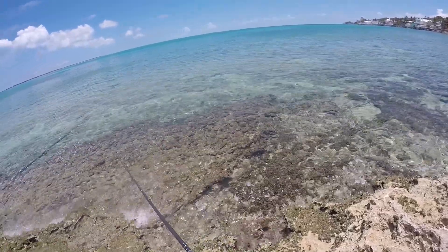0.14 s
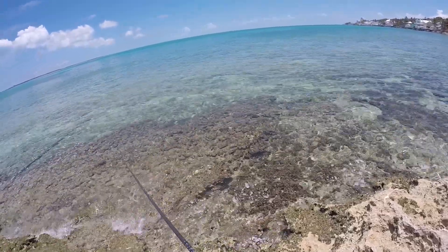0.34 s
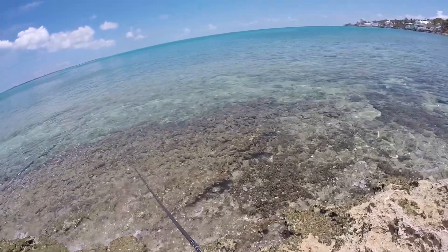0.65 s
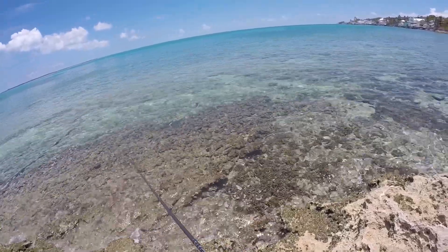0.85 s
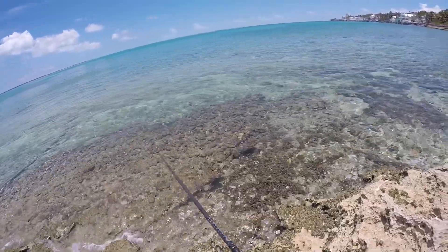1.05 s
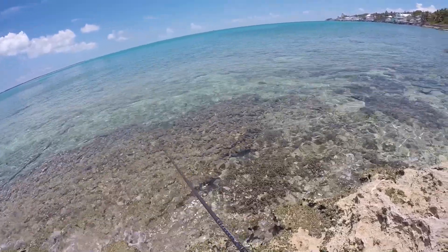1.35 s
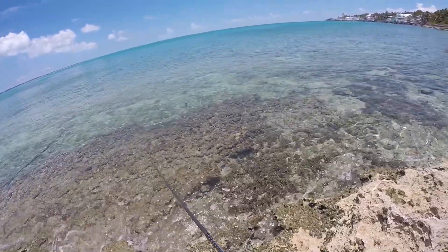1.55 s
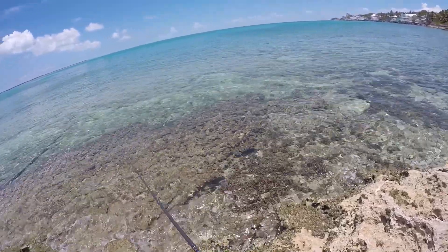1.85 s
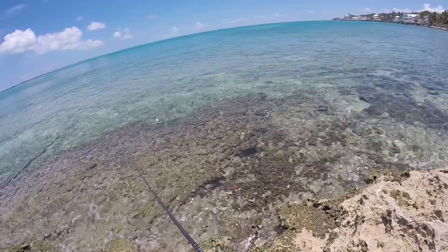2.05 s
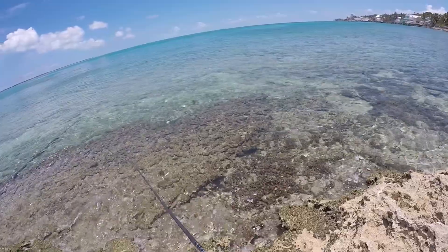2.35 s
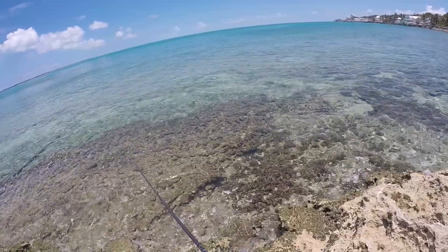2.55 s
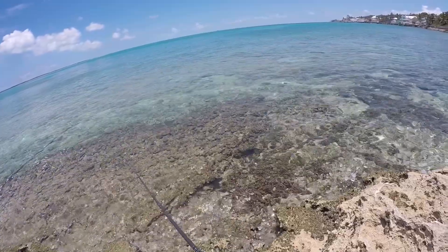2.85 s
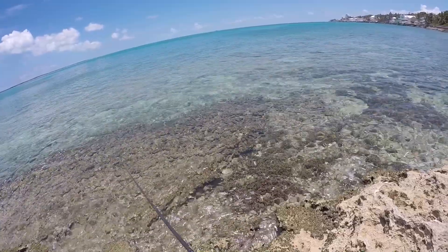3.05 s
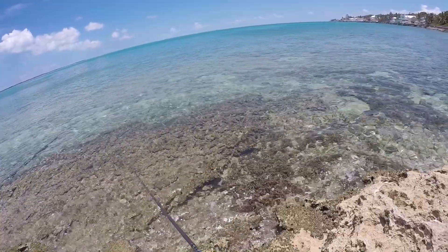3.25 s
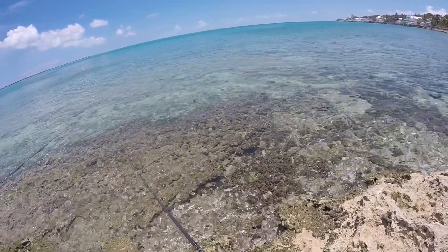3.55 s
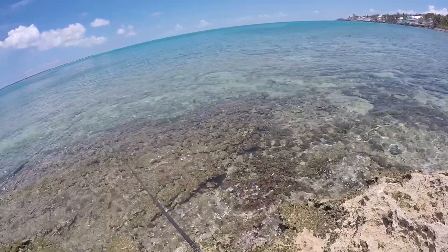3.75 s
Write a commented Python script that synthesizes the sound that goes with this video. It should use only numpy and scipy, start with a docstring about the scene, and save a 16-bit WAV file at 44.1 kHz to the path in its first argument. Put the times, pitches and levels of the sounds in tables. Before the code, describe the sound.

Seawater gulps, splashes and trickles among jagged rocks over a soft foamy hiss.

```python
"""Gulps and splashes of small waves lapping at jagged rock.
Air trapped in the hollows rings in short notes, small bubbles and drops ping higher,
and each splash throws a burst of spray that the rough rock scatters back.
Behind them foam hisses and crackles, the open sea hisses faintly,
and a light wind rumbles on the microphone."""
import sys
import numpy as np
from scipy import signal
from scipy.io import wavfile

SR = 44100
rng = np.random.default_rng(int(sys.argv[2]) if len(sys.argv) > 2 else 0)


def digitize_waveform(pressure):
    """Quantize a signal to 16-bit integers and store it at the path in sys.argv[1].

    Rows of a 2-D input are taken as channels; values are limited to [-1, 1].
    """
    field = np.atleast_2d(pressure).T
    bounded = np.clip(field, -1, 1)
    quanta = np.round(bounded * 32767).astype(np.int16)
    wavfile.write(sys.argv[1], SR, quanta)


N = 171990
CUTOFF_HZ = 15650

# The loudest bubbles and air pockets: peak_s, level_db, pitch_hz, length_cycles
BIG_BUBBLES = [(0.022, -48, 1900, 8.1), (0.042, -41.5, 560, 15), (0.06, -36, 430, 3),
               (0.084, -41, 783, 7.6), (0.108, -29, 336, 1.9), (0.11, -24.5, 436, 2.5),
               (0.134, -33.5, 493, 3.4), (0.153, -35.5, 453, 4.3), (0.19, -38, 326, 2.9),
               (0.191, -47.5, 2230, 5.3), (0.193, -34, 520, 2.4), (0.204, -43.5, 2400, 3.0),
               (0.275, -35.5, 342, 4.1), (0.28, -30.5, 925, 10.2), (0.304, -53, 2250, 7.4),
               (0.329, -28.5, 462, 3.6), (0.365, -31.5, 302, 2), (0.365, -32, 474, 4.8),
               (0.371, -38, 2370, 7.4), (0.42, -34, 381, 9.1), (0.455, -43, 352, 4.5),
               (0.466, -37.5, 880, 7.4), (0.467, -39.5, 1290, 6.2), (0.49, -41, 860, 6.7),
               (0.49, -35.5, 424, 9.5), (0.518, -35, 280, 2.45), (0.54, -32, 392, 4.2),
               (0.61, -41, 506, 6.5), (0.638, -35.5, 390, 6.5), (0.657, -28.5, 410, 3.2),
               (0.676, -24.5, 419, 5.1), (0.7, -39.5, 483, 7), (0.72, -43, 410, 5.6),
               (0.894, -42, 590, 8.3), (0.896, -39.5, 394, 9.9), (0.974, -33, 417, 4.8),
               (1.0, -45.5, 177, 9.8), (1.004, -38, 950, 3.7), (1.004, -32.5, 484, 0.75),
               (1.02, -30, 442, 3), (1.044, -38, 610, 1.9), (1.13, -41, 2220, 6), (1.327, -44.5, 590, 6.4),
               (1.38, -47, 330, 1.9), (1.55, -42.5, 456, 2.1), (1.655, -39, 530, 3.5),
               (1.76, -43, 160, 2.1), (1.782, -40.5, 950, 2.4), (1.908, -43, 666, 5.6),
               (1.956, -35.5, 405, 4.8), (1.985, -47, 1125, 14), (1.987, -31.5, 404, 3.35),
               (2.003, -40, 1000, 3.6), (2.025, -41.5, 966, 5.6), (2.031, -34.5, 2620, 1.5),
               (2.035, -42, 1290, 4.1), (2.063, -40.5, 900, 3.7), (2.063, -36, 2606, 15),
               (2.064, -43, 1880, 18), (2.068, -33.5, 475, 4), (2.118, -43, 482, 7.9),
               (2.138, -34.5, 486, 3), (2.216, -36, 2200, 2.4), (2.273, -42, 577, 3.3),
               (2.339, -31.5, 510, 1.9), (2.341, -39.5, 894, 9.3), (2.343, -42, 262, 5.3),
               (2.353, -38, 383, 13), (2.365, -46, 2540, 4.1), (2.362, -37.5, 1040, 11),
               (2.374, -40.5, 1074, 7.4), (2.375, -34, 374, 3.4), (2.377, -37, 238, 3.3),
               (2.392, -43, 1720, 5.3), (2.421, -47, 1590, 5.6), (2.43, -36, 359, 3.1),
               (2.442, -49, 1180, 5.2), (2.716, -48.5, 775, 5.1), (2.883, -45, 1800, 5.9),
               (2.887, -47, 872, 6.7), (3.077, -45.5, 1130, 3.5), (3.154, -49.5, 1650, 7.5),
               (3.215, -52, 690, 5.7), (3.338, -38.5, 550, 4.4), (3.423, -45, 1700, 2.1),
               (3.497, -45, 1460, 4.6), (3.665, -40, 1660, 1.35), (3.785, -46, 497, 8.6)]

def big_bubbles():
    """Trapped air rings in single gulps; churning water roughens each note."""
    wobble_db = 3 * drift(rate_hz=120)
    return from_db(wobble_db) * ring(BIG_BUBBLES)


# Bursts of spray: time_s, relative_level_db, centre_hz
SPLASHES = [(0.0873, -37.5, 5550), (0.188, -48, 6000), (0.2084, -47, 5630), (0.324, -46, 7100),
            (0.372, -37, 4800), (0.53, -45.5, 4400), (0.612, -46, 5000), (0.635, -44, 4330),
            (0.758, -47.5, 5700), (0.968, -51, 5000), (0.9877, -44, 4300), (1.049, -54, 10000),
            (1.148, -44, 3230), (1.215, -46, 2740), (1.485, -49, 4420), (1.5627, -56, 9900),
            (1.6545, -54, 8550), (1.7094, -43.5, 3400), (1.809, -50, 3320), (1.953, -44.5, 3800),
            (1.982, -47, 8260), (2.0308, -27, 5830), (2.038, -31, 6150), (2.046, -47, 4400),
            (2.0595, -37, 3450), (2.0665, -30, 4670), (2.076, -39, 8100), (2.088, -57, 6600),
            (2.1003, -45, 5000), (2.289, -50, 5960), (2.315, -58, 10000), (2.335, -43.5, 5300),
            (2.369, -44, 4600), (2.413, -58, 5450), (2.536, -56, 5440), (2.588, -50, 4800),
            (2.634, -50, 3700), (2.649, -60.5, 8000), (2.764, -50.5, 3350), (2.859, -53, 4700),
            (2.8805, -62, 5000), (3.021, -52, 4400), (3.048, -54, 4500), (3.074, -52.5, 5930),
            (3.1194, -60, 6000), (3.2888, -42.5, 3040), (3.406, -55.5, 6500), (3.421, -42.5, 2570),
            (3.445, -57, 5500), (3.4695, -52, 4400), (3.4955, -48.5, 3200), (3.5427, -51, 3770),
            (3.6374, -45.5, 3600)]

def splashes():
    """Each splash is a quick, grainy burst of noise with a wider, softer band of fine spray."""
    rise_s, half_width_octaves = 0.0029, .35
    length = SR // 20
    age = np.arange(length) / SR / rise_s   # 1 at the peak
    shape = (age * np.exp(1 - age)) ** 3
    out = np.zeros(N + SR)
    for time_s, level_db, hz in SPLASHES:
        grains = rng.standard_normal(length)
        grains *= from_db(2 * rng.standard_normal(length // 20 + 1)).repeat(20)[:length]
        body = rms_one(band(grains, hz * 2 ** -half_width_octaves, hz * 2 ** half_width_octaves))
        spray = from_db(-7.5) * band(grains, hz / 2, hz * 3.04)
        start = int((time_s - .002) * SR)
        out[start:start + length] += from_db(level_db - 11.5) * shape * (body + spray)
    return out[:N]


# How strongly the hollows gurgle: time_s, relative_level_db
GURGLE_LEVELS = [(0, -50), (.04, -43), (.55, -48), (.74, -52), (.87, -56), (1.0, -43.5), (1.12, -58),
                 (1.5, -62), (1.85, -55.5), (2.0, -49), (2.2, -58), (2.36, -61), (2.5, -59), (2.75, -60.5),
                 (3.6, -66), (3.9, -54.5)]

def gurgle():
    """Many smaller air pockets ring, pitched around the note of the hollows."""
    hollow_hz, spread_octaves = 403.4, 0.42
    born, size_db = random_events(per_s=500, spread_db=2.5, clump_db=2)
    hz = hollow_hz * 2 ** (spread_octaves * np.clip(rng.standard_normal(N)[born], -2, 3))
    cycles = 3.64 * rng.uniform(0.29, 1, N)[born]
    pockets = rms_one(ring(np.c_[born / SR, size_db, hz, cycles]))
    return from_db(over_time(GURGLE_LEVELS) - 2) * pockets


# The flow of foamy water: time_s, relative_level_db
FLOW_LEVELS = [(0, -58), (.3, -58.5), (.6, -57), (.8, -60.5), (1.2, -63.5), (1.6, -65.5), (2.1, -63.5),
               (2.6, -70.5), (3.2, -68.5), (3.9, -67)]
# Brief surges of foam: middle_s, half_length_s, lift_db, extra_treble_db
FOAM_SURGES = [(.07, 0.035, 6, 1), (.31, 0.15, 4, 1.5), (1.0, 0.068, 4, 1), (1.33, 0.07, 0.5, 9),
               (2.07, 0.03, 10, 6), (2.33, 0.049, 6.5, 3), (2.92, 0.067, 7.5, -5), (3.4, 0.12, 3, 0)]
# The tone of the foam: frequency_hz, relative_level_db
FOAM_TONE = [(88, -43), (150, -3.5), (260, -7.5), (528, -2), (999, -8.5), (1860, -15.5), (2430, -17),
             (4430, -21.5), (6790, -29.5), (13600, -40), (15300, -41)]

def wash():
    """Foam hisses, with drops and crackles riding on the same flow."""
    flow_db = over_time(FLOW_LEVELS)
    surge_db, treble_db = swells(FOAM_SURGES)
    hiss = flickering_noise(FOAM_TONE, shared_db=1.93, own_db=1.77, rate_hz=78, treble_db=treble_db)
    patter = from_db(-2) * drops() + from_db(-11) * crackles()
    buried_db = -0.53 * (flow_db - flow_db.mean())   # more flow buries the patter in the hiss
    return from_db(flow_db + surge_db) * (from_db(7) * hiss + from_db(buried_db) * patter)


# How loud drops are at each pitch: pitch_hz, relative_level_db
DROP_TONE = [(700, -10.5), (1500, -7.5), (3000, -8.5), (6000, -8), (13000, -24)]

def drops():
    """Droplets and fine bubbles ping across four octaves."""
    born, size_db = random_events(per_s=900, spread_db=5.5, clump_db=4.5)
    hz = 700 * 2 ** rng.uniform(0, 4.046, N)[born]
    cycles = 5.1 * rng.uniform(0.17, 1, N)[born]
    return rms_one(ring(np.c_[born / SR, size_db + level_at(DROP_TONE, hz), hz, cycles]))


def crackles():
    """Spray lands on rock in tiny ticks of noise."""
    tick_s = 0.002
    born, size_db = random_events(per_s=40, spread_db=7, clump_db=-9)
    strikes = np.zeros(N)
    strikes[born] = from_db(size_db)
    bursts = smooth(strikes, keep=np.exp(-1 / (tick_s * SR)))
    noise = flickering_noise(FOAM_TONE[3:], shared_db=9, own_db=-3.5, rate_hz=39)   # foam without bass
    return rms_one(bursts * noise)


def rock_echo(sound):
    """Rough rock scatters the nearby sound into a short, dull tail."""
    fade_s, dull_above_hz = 0.14, 4600
    t = np.arange(SR // 8) / SR
    tail = rng.standard_normal(len(t)) * from_db(-60 * t / fade_s) * (t > .002)
    tail = signal.lfilter([1], [1, -np.exp(-2 * np.pi * dull_above_hz / SR)], tail)
    tail /= np.sqrt(np.sum(tail ** 2))
    return from_db(-10.5) * signal.fftconvolve(sound, tail)[:N]


# The tone of the wind: frequency_hz, relative_level_db
WIND_TONE = [(8.8, -27), (15, 1.5), (43, -1), (58, -3), (97, -6.5), (200, -20), (260, -66), (440, -120)]
# Thuds of wind: peak_s, level_db, pitch_hz, length_cycles
WIND_THUDS = [(.115, -40, 69.6, 3.3), (1.62, -45.5, 37.5, 1.4), (2.2, -42.5, 41.3, 2.5),
              (3.26, -37, 43.5, 3.1)]

def wind():
    """Air pushes on the microphone, making a lumpy rumble and a few low thuds."""
    rumble = flickering_noise(WIND_TONE, shared_db=1, own_db=2, rate_hz=5.2)
    return from_db(-53.5) * rumble + ring(WIND_THUDS)


def open_sea():
    """Water further out makes a faint, even, high hiss."""
    return from_db(-88) * rms_one(band(rng.standard_normal(N), 5060, CUTOFF_HZ))


def ring(notes):
    """Each bubble or thud is a pure tone that swells, climbs in pitch and dies away."""
    climb_per_cycle, fade_stretch = 0.0051, 1.31
    out = np.zeros(N + 2 * SR)
    for peak_s, level_db, hz, cycles in notes:
        swell_cycles = 0.49 * cycles
        length = int((2 + 2.5 * fade_stretch) * swell_cycles / hz * SR)
        turns = np.arange(length) * hz / SR - 2 * swell_cycles   # cycles since the peak
        shape = np.exp(-(turns / swell_cycles / np.where(turns > 0, fade_stretch, 1)) ** 2)
        tone = -np.cos(2 * np.pi * (turns + climb_per_cycle * turns ** 2 / 2))   # pressure dips at peak
        start = SR + int((peak_s - 2 * swell_cycles / hz) * SR)
        out[start:start + length] += from_db(level_db) * shape * tone
    return out[SR:SR + N]


def random_events(per_s, spread_db, clump_db):
    """Start samples that come in clumps, and sizes in dB: most small, a few big."""
    born = np.flatnonzero(rng.random(N) < per_s * from_db(clump_db * drift(rate_hz=9)) / SR)
    return born, spread_db * np.minimum(rng.exponential(1, N), 4)[born]


def flickering_noise(tone, shared_db, own_db, rate_hz, treble_db=0):
    """Noise in bands a third of an octave wide that flicker both together and alone."""
    out, together = 0, drift(rate_hz)
    octaves = np.log2(tone[-1][0] / tone[0][0])
    edges_hz = tone[0][0] * 2 ** np.arange(0, octaves + 1 / 3, 1 / 3)
    white = rng.standard_normal((2, N))
    for k, (low, high) in enumerate(zip(edges_hz, edges_hz[1:])):
        hz = np.sqrt(low * high)
        treble_share = np.clip(np.log2(hz / 4500), 0, 1)
        flicker_db = shared_db * together + own_db * drift(rate_hz)
        gain = from_db(level_at(tone, hz) + flicker_db + treble_share * treble_db)
        out = out + gain * band(white[k % 2], low, high)
    return rms_one(out)


def drift(rate_hz):
    """A random wander of typical size 1; a higher rate wanders faster."""
    step, warm_up = 40, 2000
    noise = rng.standard_normal(N // step + warm_up + 2)
    slow = smooth(noise, keep=np.exp(-2 * np.pi * rate_hz * step / SR))[warm_up:]
    return np.interp(np.arange(N) / step, np.arange(len(slow)), rms_one(slow - slow.mean()))


def smooth(x, keep):
    """Smear each value into a rise and fall, longer as keep nears 1."""
    return signal.lfilter([1], [1, -2 * keep, keep ** 2], x)


def swells(rows):
    """Add up smooth bumps, giving one curve for each dB column."""
    t = np.arange(N) / SR
    return sum(np.outer(db, np.exp(-((t - middle_s) / half_s) ** 2)) for middle_s, half_s, *db in rows)


def over_time(points):
    """Join the points with straight lines, one level per sample."""
    return np.interp(np.arange(N) / SR, *np.transpose(points))


def level_at(tone, hz):
    """Read a tone table between its rows, with octaves evenly spaced."""
    table_hz, table_db = np.transpose(tone)
    return np.interp(np.log(hz), np.log(table_hz), table_db)


def band(x, low_hz, high_hz):
    """Keep the sound between two frequencies."""
    sections = signal.butter(2, [low_hz, min(high_hz, .45 * SR)], "band", fs=SR, output="sos")
    return signal.sosfilt(sections, x)


def from_db(db):
    """Turn decibels into a multiplier."""
    return 10 ** (np.asarray(db) / 20)


def rms_one(x):
    """Scale to an average strength (rms) of 1."""
    return x / np.sqrt(np.mean(x ** 2) + 1e-20)


def scene():
    """Nearby water and its echo, then foam, sea and wind, in one channel."""
    near = big_bubbles() + gurgle() + splashes()
    return (near + rock_echo(near) + wash() + open_sea() + wind())[None]


def record(dry):
    """Cut off the very highest treble."""
    return signal.sosfilt(signal.cheby2(24, 70, CUTOFF_HZ, fs=SR, output="sos"), dry)


dry = scene()
out = record(dry)
digitize_waveform(out)
```